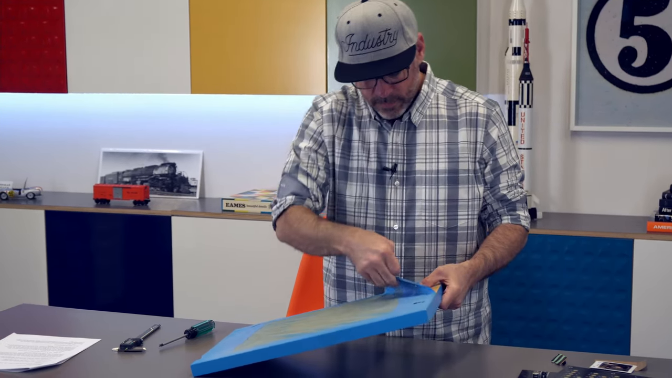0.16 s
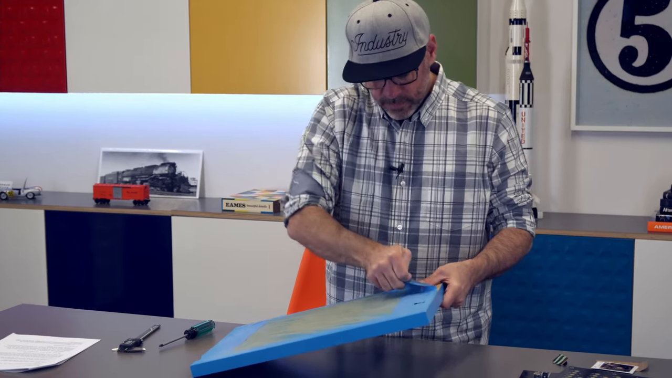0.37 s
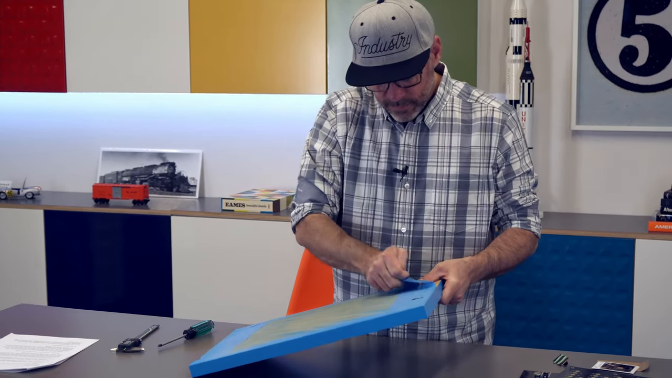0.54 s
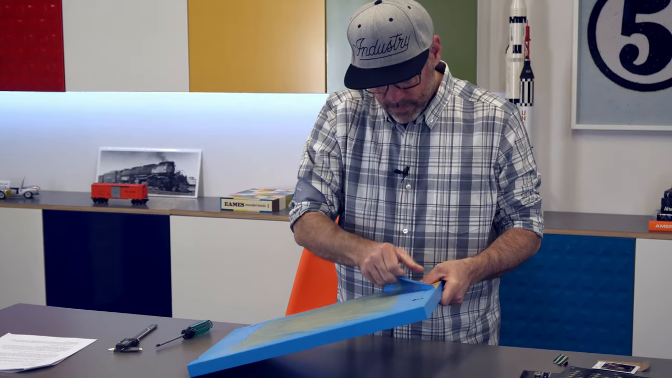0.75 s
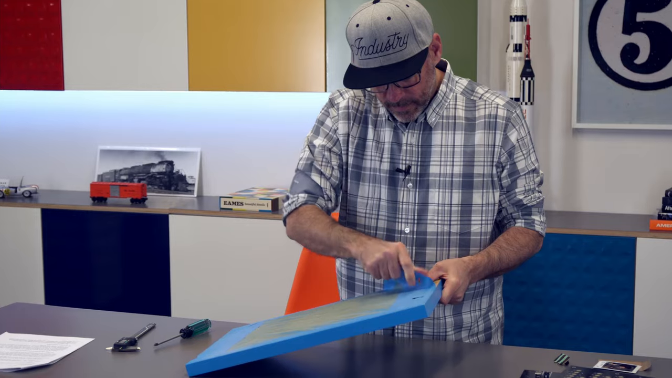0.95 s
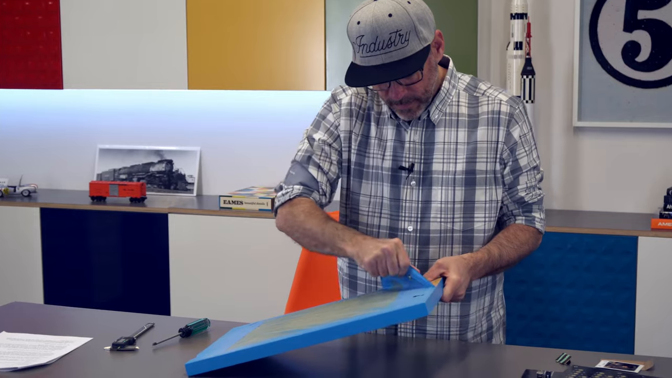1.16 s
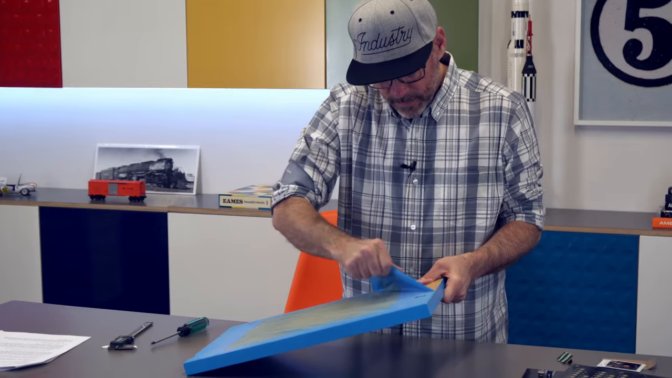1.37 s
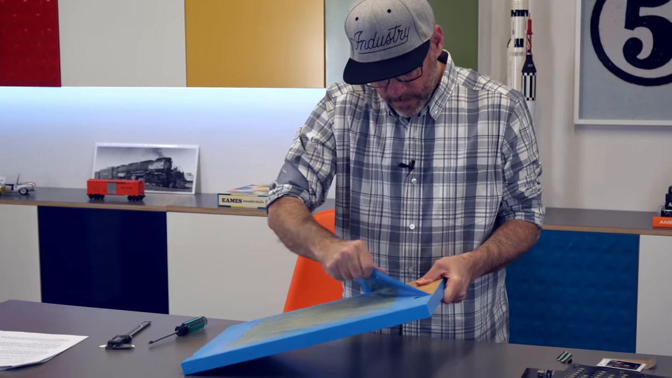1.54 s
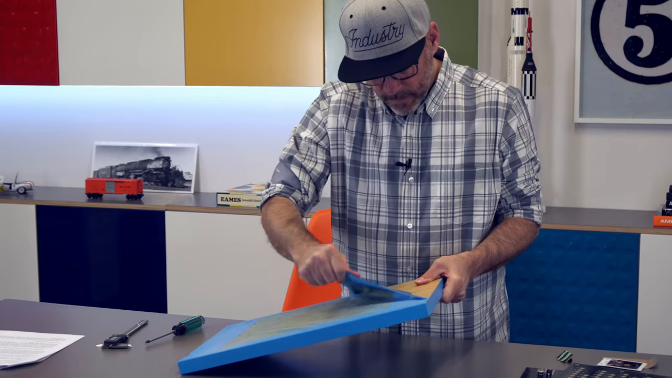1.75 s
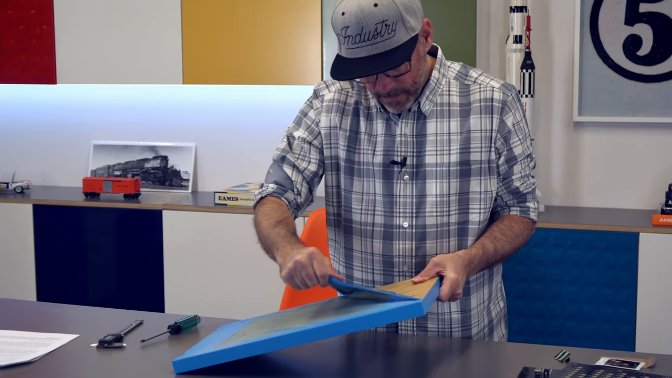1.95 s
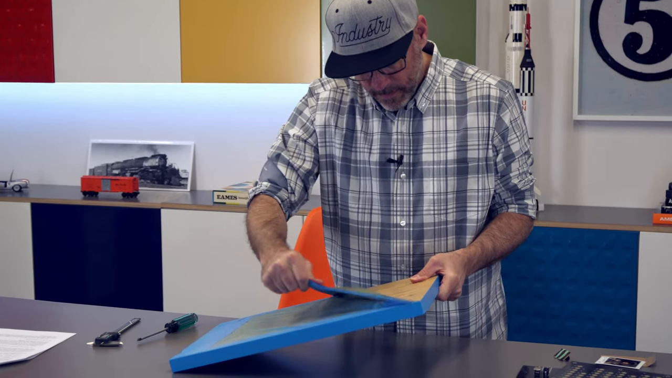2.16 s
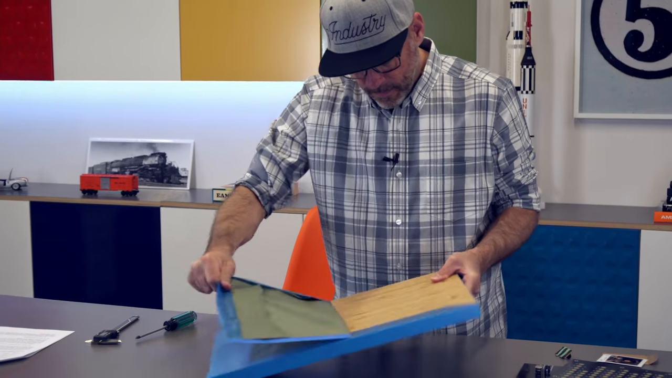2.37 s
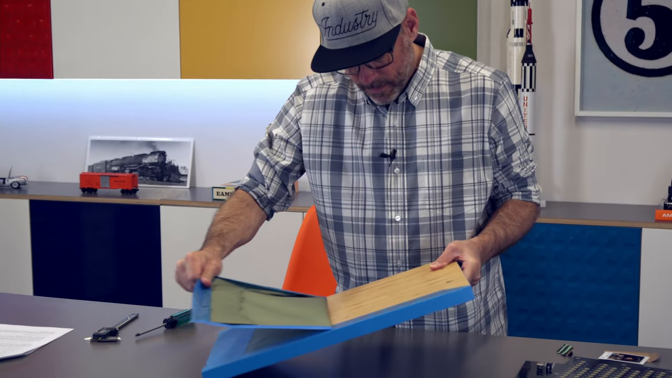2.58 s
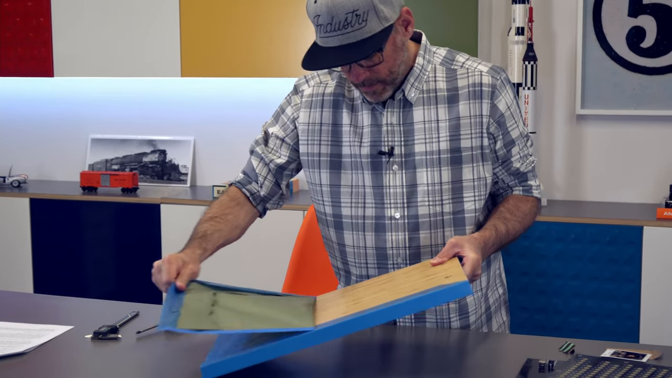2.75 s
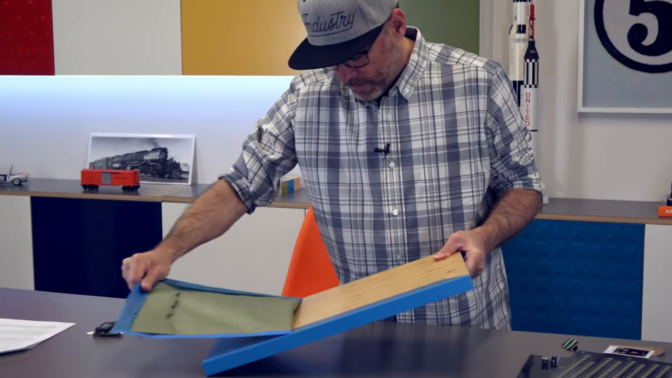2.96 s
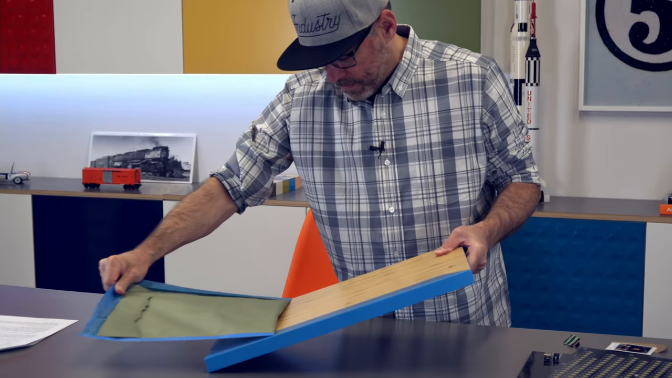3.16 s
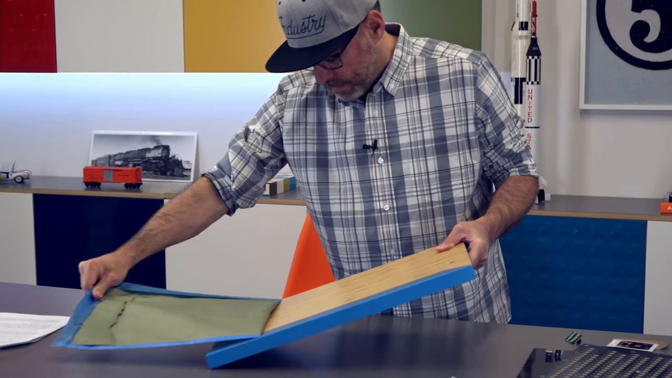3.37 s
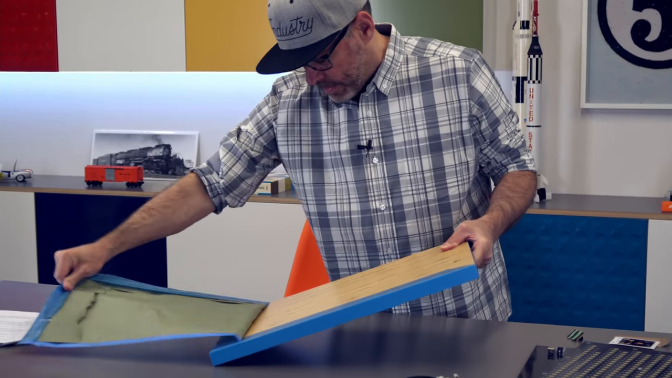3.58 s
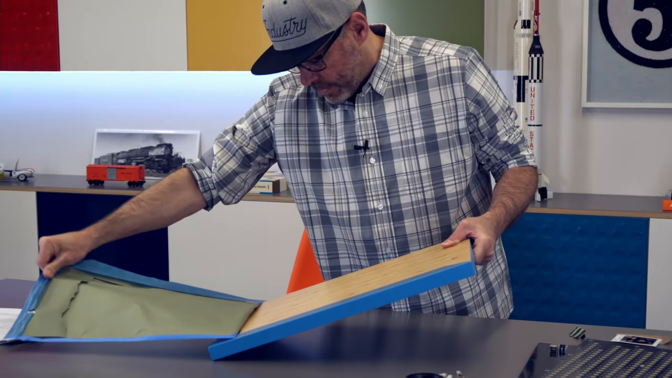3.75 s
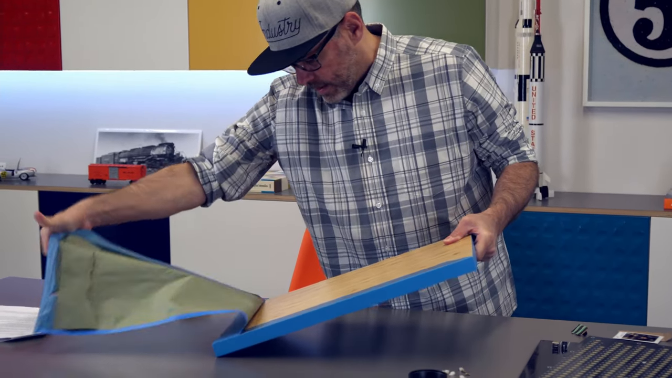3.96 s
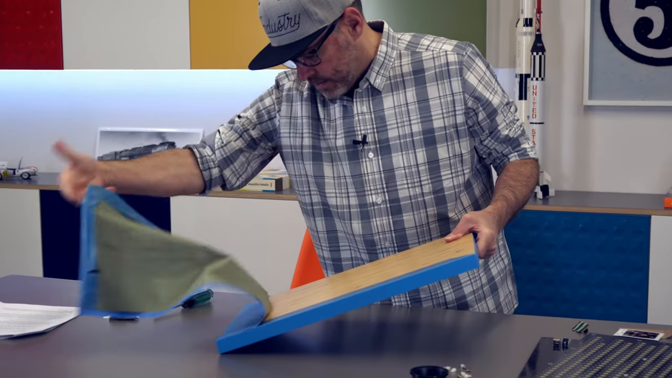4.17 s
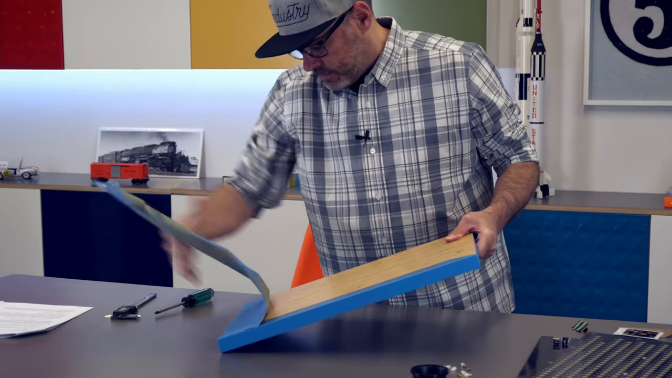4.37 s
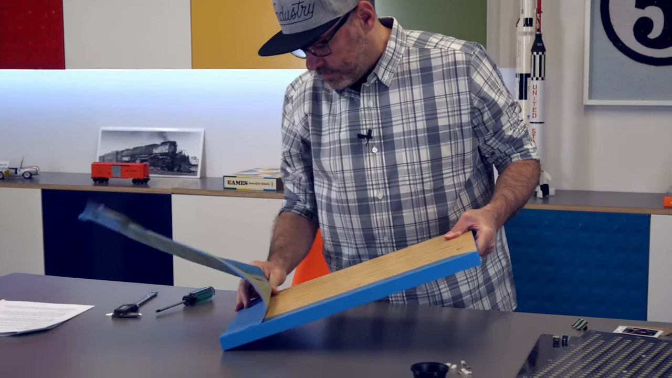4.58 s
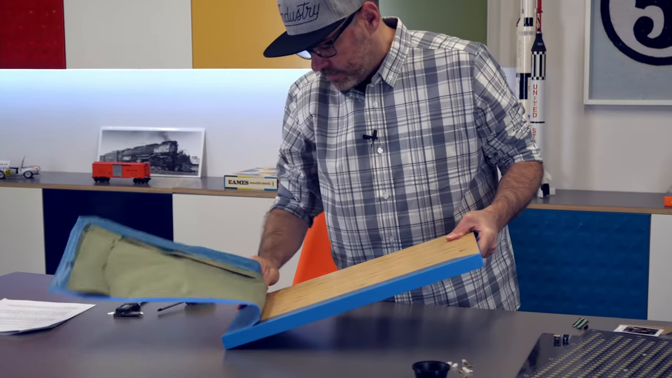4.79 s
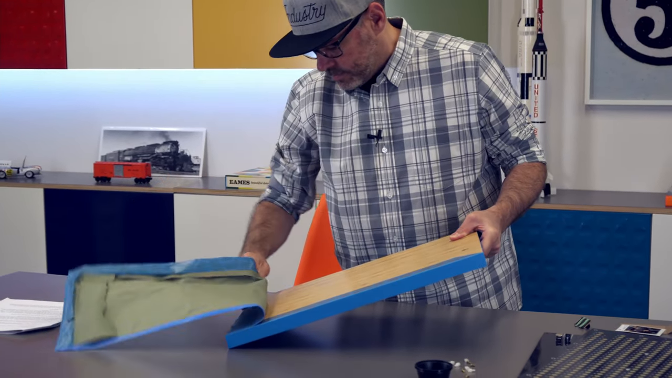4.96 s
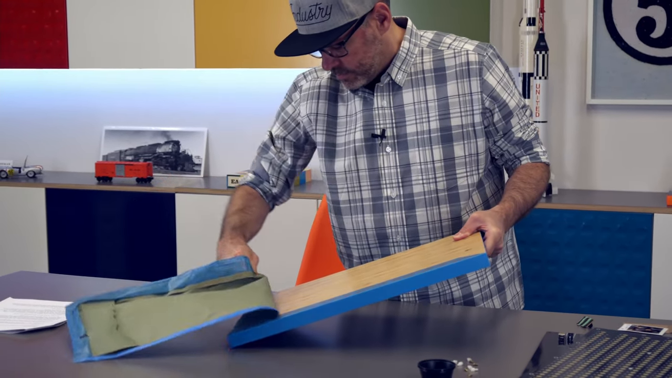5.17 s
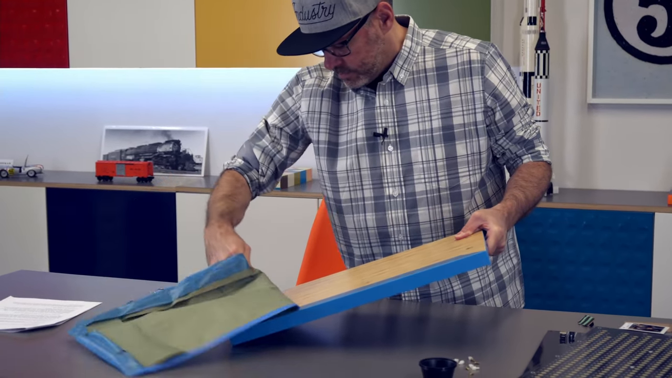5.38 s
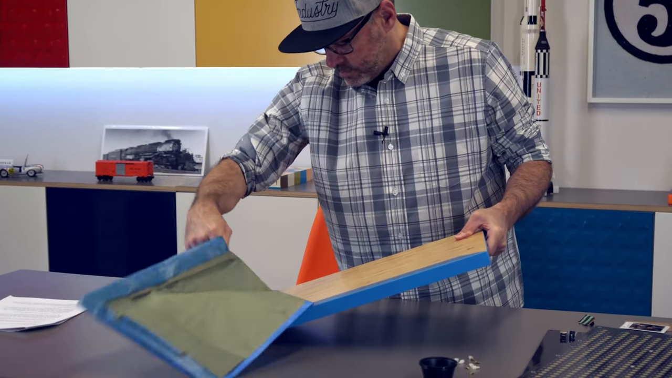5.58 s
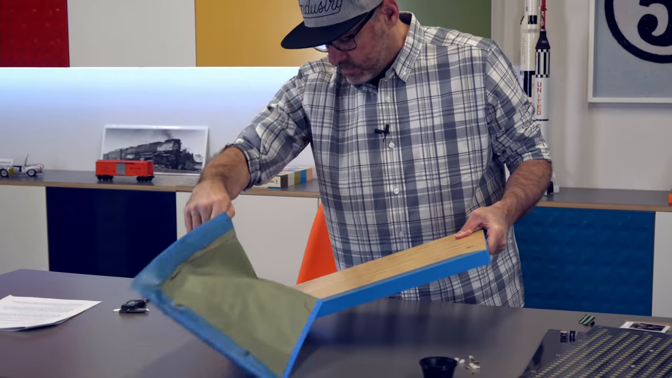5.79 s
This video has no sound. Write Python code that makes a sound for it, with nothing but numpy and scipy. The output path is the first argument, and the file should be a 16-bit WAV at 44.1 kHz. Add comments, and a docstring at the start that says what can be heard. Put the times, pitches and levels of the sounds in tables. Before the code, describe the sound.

In a quiet workshop, close to a clip-on microphone, tape and stiff paper come off a wooden frame. Faint glue crackles and isolated creasing snaps grow busier around 1.6 seconds; a loud rip with wooden knocks follows near 2.3, snapping densely until about 3.6. Then sparse rustles and pops, a few soft knocks, and a swelling crackle at the end.

```python
"""Masking tape and painted paper peel off a wooden frame, close to a clip-on microphone in a still workshop.
First the glue lets go in light crackles of tiny random pops, with a few snaps: creases buckling in short bursts.
From 1.2 s to 1.9 s a hand slides under the sheet, friction noise in a sinking resonance. Near 2.3 s the long rip
jerks the frame, whose modes ring as knocks; filtered-noise rustle and dense snaps follow until about 3.6 s.
The peel thins, a few knocks return after 5.2 s, and the pull strengthens to the end. The room answers faintly."""
import sys
import numpy as np
from scipy import signal
from scipy.fft import rfft, irfft, next_fast_len
from scipy.io import wavfile
from scipy.ndimage import uniform_filter1d

SR = 44100
rng = np.random.default_rng(int(sys.argv[2]) if len(sys.argv) > 2 else 0)


def store_wav(level_fs):
    """Save 16-bit WAV to argv[1]."""
    pcm = np.round(np.clip(np.atleast_2d(level_fs), -1, 1) * 32767)
    wavfile.write(sys.argv[1], SR, pcm.T.astype(np.int16))


N = 257103

# still room air, relative spectrum: (frequency [Hz], density [dB per Hz])
AIR_SPECTRUM = [(15, -50), (25, -17), (119, 14.5), (399, 2), (631, 2), (1660, -23), (2630, -18),
                (6380, -34), (7100, -14.5), (15500, -35)]
# decay of the room: (frequency [Hz], t60 [s])
ROOM_DECAY = [(200, 1), (2000, 0.3), (14000, 0.2)]
# modes of the wooden frame: (frequency [Hz], level [dB], t60 [s])
FRAME_MODES = [(120.4, -6, 0.11), (183.4, -9.5, 0.59), (357, 1, 0.13), (408.6, -1, 0.1), (541, -4, 0.086),
               (657, -8.5, 0.058), (875, -1, 0.042), (1034, -3.5, 0.1)]
# knocks on the frame: (time [s], peak [dB], centre of the blow [Hz])
FRAME_KNOCKS = [(0.566, -33.5, 387), (1.264, -40, 334), (2.271, -19, 370), (2.479, -13, 590),
                (2.495, -17, 810), (2.537, -15, 410), (2.597, -23, 390), (5.263, -30, 400),
                (5.285, -37, 150), (5.431, -23, 610)]
# hand under the lifting sheet, whose hollow deepens: (time [s], level [dB], resonance [Hz])
HAND_SLIDE = [(1.22, -77, 330), (1.39, -43.5, 305), (1.48, -59, 213.3), (1.57, -47.5, 164.2),
              (1.78, -52.5, 134), (1.9, -79, 122)]
# creases buckling: (time [s], crack [dB], hollow pop [dB re crack], fizz [dB re crack], length [ms])
CREASE_SNAPS = [(0.2455, -21.0, -8.5, -0.5, 0.27), (0.4197, -34, -2.5, 6.5, 0.4),
                (0.4452, -22.5, -7, -4, 2.1), (0.4854, -28.0, -7.5, -4.5, 0.61),
                (0.7959, -38.5, 6, -5.0, 1), (0.9506, -21, -3, -13, 0.19),
                (1.0409, -18.5, -2.5, -4.5, 0.36), (1.1997, -18.5, -3.5, -3.5, 0.18),
                (1.2787, -21, -14.0, 0, 0.3), (1.4255, -33, 7, -8.5, 0.54), (1.4371, -28.5, 2, 12, 0.31),
                (1.6231, -11.5, -1.0, -1, 0.96), (1.6452, -16.5, -7.5, -2, 0.5),
                (1.6611, -14, -10, -7, 0.39), (1.6786, -17.5, 3, 6.5, 1.4), (1.8324, -17.5, -4, -10, 1.24),
                (1.9635, -22.5, -2, -3.5, 2.1), (2.0012, -23.5, -6, -11, 0.17), (2.0501, -22, -10, -8, 1.2),
                (2.2404, -16.0, -4, 0.5, 0.7), (2.2538, -22, 1, 2, 1.8), (2.2879, -16.5, -11, 11, 1.12),
                (2.2973, -15, -25, -1, 7.8), (2.3129, -22, -2, 13, 0.93), (2.3377, -16.5, -2, 7.5, 1.5),
                (2.3548, -19, -8, 7, 1.0), (2.3627, -19, -4, 7, 0.51), (2.4114, -23, 6, 8, 1.6),
                (2.4643, -13.5, -7, -8, 0.38), (2.5407, -15.5, -3.5, 0, 1.2),
                (2.6342, -15.5, -0.5, -7, 1.8), (2.6514, -21, -1, -3.0, 0.54), (2.688, -18.5, -6, -5, 1.2),
                (2.729, -14.5, -3, -3, 0.49), (2.7545, -11.5, -8, -2.5, 0.3), (2.8013, -28, -12, 12, 0.2),
                (2.8433, -13, -1.5, -0.5, 2.9), (2.8896, -17.5, 3, 1.5, 1), (2.896, -23, 7, 3, 2.1),
                (3.0246, -19.0, -0.5, -2, 1.8), (3.0354, -12, -10, -5, 0.29), (3.042, -17, -5, 2, 1.6),
                (3.0556, -16.5, -2, -0.5, 5.4), (3.1155, -11.5, -15, 0, 0.39), (3.163, -9, -18, -13, 0.18),
                (3.1913, -15.5, -12, -4, 0.3), (3.2006, -15, -4.5, -1, 1.2), (3.2433, -23, 4, -5, 1.8),
                (3.311, -12.0, -6.5, -3, 0.098), (3.3192, -18, -7.5, -15, 0.42),
                (3.3973, -18, -6, -13, 1.4), (3.4419, -12.5, -14.5, -1.5, 0.17),
                (3.4636, -21, -1, 0.5, 2.8), (3.475, -24.0, -7, 6, 0.54), (3.4894, -14, -9.5, -12, 0.49),
                (3.509, -20.0, -16, -1, 0.66), (3.5224, -19, -14, 2, 0.25), (3.532, -21.5, -25, 0, 0.15),
                (3.5796, -15, -18, -6.5, 0.56), (3.7834, -19.5, -21, 1, 0.55),
                (3.9775, -23.5, -0.5, 2.5, 0.5), (4.08, -22.5, -4.5, -2.5, 1.9),
                (4.2156, -37, -12, -21, 1.4), (4.2601, -27, -2, -5, 3.1), (4.306, -22.5, -6, -16, 2.2),
                (4.374, -26.5, -3, -11, 1.3), (4.4058, -21, -4, -9.5, 2.7), (4.4165, -24, -4, -4, 4.2),
                (4.81, -19.5, -0.5, -4, 0.4), (4.8525, -35, -9, 10, 0.2), (4.9297, -29, -0.5, 0, 0.52),
                (5.0372, -28.5, 1.5, 1, 3), (5.4752, -16.5, -1, -2.5, 0.9), (5.4827, -21.5, 3.5, -3, 2.5),
                (5.6593, -20.5, -2, -2.5, 0.3), (5.7431, -12, -7, -11, 2.7),
                (5.7687, -12.5, -15, -5.5, 4.3)]
# steady pull on the tape: (time [s], glue crackle [dB])
STEADY_PULL = [(0.06, -71.5), (0.22, -62), (0.26, -56.5), (0.78, -62), (1.24, -55), (1.38, -47.5),
               (1.76, -43), (1.92, -49), (2.2, -40.5), (2.58, -39.5), (3.05, -39), (3.35, -43),
               (3.62, -39.5), (4.19, -50.5), (4.44, -43.5), (4.75, -54.5), (4.9, -49), (5.15, -50),
               (5.83, -37)]
# tugs, a stretch of tape letting go at once; those near 2.3 s are the main rip:
# (start [s], length [s], crackle [dB], rustle [dB re crackle])
TAPE_TUGS = [(-0.014, 0.046, -57, -1.5), (0.437, 0.044, -51, -16), (0.59, 0.077, -60, 3.5),
             (0.688, 0.013, -52, 7.5), (0.845, 0.02, -48, 9), (1.622, 0.14, -44.5, -2.5),
             (1.762, 0.023, -41, 4.5), (1.953, 0.013, -37, -3), (2.12, 0.012, -34, -3),
             (2.262, 0.026, -35.5, 0), (2.294, 0.084, -26.5, -2.5), (2.331, 0.11, -27, -2),
             (2.494, 0.0084, -29.5, -4), (2.578, 0.0052, -26, -4), (2.943, 0.014, -32.5, -2.5),
             (3.167, 0.076, -36.5, -2), (3.787, 0.0067, -30.5, -12.5), (3.88, 0.053, -31.5, -6),
             (3.986, 0.024, -34.5, -6), (4.302, 0.013, -36, -2.5), (4.355, 0.0069, -29, -5.5),
             (4.496, 0.013, -27, -3), (4.592, 0.028, -56, 8.5), (4.678, 0.011, -43.5, -2),
             (4.801, 0.065, -40, 0), (5.24, 0.047, -45.5, 3), (5.313, 0.0059, -44, 9),
             (5.35, 0.0037, -39, 6.5), (5.422, 0.073, -43, 2), (5.626, 0.023, -36, -1.5),
             (5.721, 0.025, -28.5, -17)]
# how the sheet is held: (time [s], fizz [dB re crackle], flexing [dB re rustle])
SHEET_HOLD = [(0.0, 2, -61), (0.55, -4, -2.5), (0.85, -4, -9.5), (1.4, 2, -2.5), (2.0, -3.5, -9),
              (2.42, 1.8, -13), (2.6, -3.5, -1.5), (2.95, 0, -6), (3.55, -2, -4.5), (3.72, -1.5, -2.5),
              (3.92, -7, -4), (4.25, -4, -1), (4.82, -6.5, -3), (5.13, 3.5, 1.5), (5.35, 0, -3.5),
              (5.7, -7, -1), (5.83, -1, 2)]
# smooth sliding as opposed to rupture: (time [s], share [0-1])
SLIP_SHARE = [(0.2, 0.1), (0.9, 0.15), (1.45, 0.3), (2.3, 0.1), (3.0, 0.57), (4.4, 0.13), (4.65, 0.3),
              (5.5, 0.42)]
# radiation of the sheet, relative spectrum: (frequency [Hz], density [dB per Hz])
PAPER_SPECTRUM = [(60, -39), (156, -7.5), (220, -8), (359, -4.5), (533, 0), (1050, 1.5), (1650, 5),
                  (3200, -1.5), (4420, 0), (6560, -1.5), (7720, -5.5), (15500, -12.5)]

# registers of the sheet
FLEX_BAND_HZ, RUSTLE_BAND_HZ = (100, 600), (600, 2450)
CRACKLE_BAND_HZ, FIZZ_BAND_HZ = (2800, 8000), (8000, 16000)
# centres of a snap's registers; spread of the crack's pitch from crease to crease, in log frequency
SNAP_POP_HZ, SNAP_CRACK_HZ, SNAP_FIZZ_HZ, PITCH_SPREAD = 1634, 5630, 11520, 0.21
# a tug's rise time and its dying time constant: seconds plus a share of its length
ATTACK_S, ATTACK_SHARE = 0.00098, 0.058
RELEASE_S, RELEASE_SHARE = 0.0056, 0.46
EVENNESS = 0.25  # how far the random pops are evened out over 50 ms [0-1]
AIR_DB, PEEL_TO_ROOM_DB, HITS_TO_ROOM_DB = -64.5, -25.0, -23.5
TOP_HZ = 16050  # band limit of the recorder


def amp(db):
    """Decibels to gain."""
    return 10 ** (np.asarray(db) / 20)


def unit(x):
    """Scale to rms 1."""
    return x / np.sqrt(np.mean(x ** 2) + 1e-20)


def along(points, hz):
    """(frequency [Hz], value) points read on a log-frequency axis."""
    f, v = np.transpose(points)
    return np.interp(np.log(hz + 1), np.log(f + 1), v)


def curves(rows):
    """One value per sample for each column after the time."""
    s, *cols = np.transpose(rows)
    return [np.interp(np.arange(N) / SR, s, c) for c in cols]


def filtered(x, response):
    """x times a response of frequency."""
    m = next_fast_len(N + SR // 2)
    hz = np.fft.rfftfreq(m, 1 / SR)
    return irfft(rfft(x, m) * response(hz), m)[:N]


def band(x, edges_hz, order):
    """Causal band-pass."""
    edges_hz = np.minimum(edges_hz, SR / 2 - 100)
    sos = signal.butter(order, edges_hz, "band", fs=SR, output="sos")
    return signal.sosfilt(sos, x)


def add(track, s, sound):
    """Mix a sound into the track at time s."""
    part = track[round(s * SR):][:len(sound)]
    part += sound[:len(part)]


def still_air():
    """Steady noise shaped to the spectrum of the quiet room."""
    noise = rng.standard_normal(N)
    return amp(AIR_DB) * unit(filtered(noise, lambda hz: amp(along(AIR_SPECTRUM, hz))))


def workshop(x):
    """The room's diffuse answer: a noise tail of unit energy, shorter in the treble."""
    hz, t, z = signal.stft(rng.standard_normal(SR // 2), SR, nperseg=256)
    decay = amp(-60 * t / along(ROOM_DECAY, hz)[:, None])
    tail = signal.istft(z * decay, SR, nperseg=256)[1]
    tail = np.pad(tail, (SR // 200, 0))  # 5 ms later than the direct sound
    return signal.fftconvolve(x, tail / np.linalg.norm(tail))[:N]


def knocks():
    """Soft blows ring the frame's modes near their own pitch; the harder the tug, the more the grip damps them."""
    out, t = np.zeros(N), np.arange(SR // 2) / SR
    hz, level_db, t60_s = np.transpose(FRAME_MODES)[:, :, None]
    for s, db, centre_hz in FRAME_KNOCKS:
        off_pitch_db = 6 * np.abs(np.log2(hz / centre_hz))
        strength_db = level_db + rng.standard_normal(hz.shape) - off_pitch_db
        tones = np.sin(2 * np.pi * (hz * t + rng.random(hz.shape)))
        ringing = (amp(strength_db - 60 * t / t60_s) * tones).sum(axis=0)
        grip = amp(-.8 * (db + 36.5)) + amp(-60 * t / 0.047)
        scuff = unit(band(rng.standard_normal(len(t)), centre_hz * np.array([.4, 2.4]), order=2))
        scuff = 0.97 * scuff * amp(-60 * t / 0.022)
        soft_onset = 1 - np.exp(-t / 0.0075)
        blow = (grip * ringing + scuff) * soft_onset
        add(out, s, amp(db) * blow / np.abs(blow).max())
    return out


def sliding():
    """Friction noise in one broad resonance that sinks as the hollow grows."""
    db, hz = curves(HAND_SLIDE)
    width_hz = 42
    # two slow noises on a carrier in quadrature make a band of noise around it
    sway = [filtered(rng.standard_normal(N), lambda f: 1 / (1 + (f / width_hz) ** 4)) for _ in range(2)]
    phase = 2 * np.pi * np.cumsum(hz) / SR
    return amp(db) * unit(sway[0] * np.cos(phase) + sway[1] * np.sin(phase))


def burst(edges_hz, life_ms, ring_db, ring_ms):
    """A sudden kick and a dying flutter in one band, with the energy of one millisecond at rms 1."""
    ms = np.arange(SR // 50) * 1000 / SR
    rise_ms = 0.29
    decay = np.exp(-ms / life_ms) + amp(ring_db) * np.exp(-ms / ring_ms)
    shape = (1 - np.exp(-ms / rise_ms)) * decay
    flutter = unit(band(rng.standard_normal(len(ms)) * shape, edges_hz, order=2))
    click = signal.unit_impulse(len(ms), rng.integers(6, 16))
    kick = unit(band(click, edges_hz, order=4))
    sound = np.sign(rng.standard_normal()) * kick + (.5 + life_ms) * flutter
    return sound / np.linalg.norm(sound) * np.sqrt(SR / 1000)


def snap(db, pop_db, fizz_db, ms):
    """A crease flips with a crack; a patch of sheet pops along with it and thuds faintly."""
    octave = np.array([1 / np.sqrt(2), np.sqrt(2)])
    # the pop varies less in pitch than the crack
    pop_pitch, crack_pitch = np.exp(PITCH_SPREAD * rng.standard_normal(2) * [.5, 1])
    pop = burst(SNAP_POP_HZ * pop_pitch * octave, ms, ring_db=-26, ring_ms=2.5)
    thud = amp(-11.5) * burst(np.array([280, 760]), ms, ring_db=-15, ring_ms=5.7)
    crack = burst(SNAP_CRACK_HZ * crack_pitch * octave, ms, ring_db=-14, ring_ms=2.3)
    fizz = burst(SNAP_FIZZ_HZ * octave, .8 * ms, ring_db=-8, ring_ms=1.2)
    return amp(db) * (crack + amp(pop_db) * (pop + thud) + amp(fizz_db) * fizz)


def snaps():
    """The big creases buckle one by one."""
    out = np.zeros(N)
    for s, db, pop_db, fizz_db, ms in CREASE_SNAPS:
        add(out, s, snap(db, pop_db, fizz_db, ms))
    return out


def effort():
    """Crackle and rustle levels [dB]: the steady pull plus each tug with its attack, hold and release."""
    t = np.arange(N) / SR
    pull_db, = curves(STEADY_PULL)
    crackle_power, rustle_power = amp(pull_db) ** 2, amp(pull_db - 1.5) ** 2
    for s, length_s, db, rustle_db in TAPE_TUGS:
        attack_s = ATTACK_S + ATTACK_SHARE * length_s
        release_s = RELEASE_S + RELEASE_SHARE * length_s
        rise = np.clip((t - s) / attack_s + .5, 0, 1)  # half risen at the start time
        fall = np.exp(-np.clip((t - s - length_s) / release_s, 0, 20))
        power = (amp(db) * rise * fall) ** 2
        crackle_power = crackle_power + power
        rustle_power = rustle_power + power * amp(rustle_db) ** 2
    return 10 * np.log10(crackle_power), 10 * np.log10(rustle_power)


def pops(rate_hz, spread_db, life_ms):
    """Power, of mean 1, of a stream of tiny ruptures, partly evened out over 50 ms so no random pop sticks out."""
    sizes = amp(spread_db * np.minimum(rng.standard_normal(N), 2)) ** 2
    starts = sizes * (rng.random(N) < rate_hz / SR)
    ms = np.arange(SR // 100) * 1000 / SR
    pulse = ms * np.exp(-2 * ms / life_ms)
    power = np.abs(signal.fftconvolve(starts, pulse)[:N])
    local_mean = uniform_filter1d(power, size=SR // 20)
    power = power / (local_mean + power.mean() / 10) ** np.clip(EVENNESS, 0, 1)
    return power / power.mean()


def paper(power, edges_hz, smooth):
    """One register of the sheet, shaken by ruptures and by a smooth share of sliding."""
    smooth = np.clip(smooth, 0, 1)
    drive = rng.standard_normal(N) * np.sqrt(smooth + (1 - smooth) * power)
    radiated = filtered(drive, lambda hz: amp(along(PAPER_SPECTRUM, hz)))
    return unit(band(radiated, edges_hz, order=3))


def frame_tone(power):
    """The tugs of the tape keep the resonant modes of the frame ringing."""
    def response(f):
        total = 0
        for hz, db, t60_s in FRAME_MODES:
            width_hz = np.log(1000) / (np.pi * t60_s)  # bandwidth of a mode that dies in t60
            total = total + amp(db) * 1j * f * width_hz / (hz * hz - f * f + 1j * f * width_hz)
        return total

    tugs = rng.standard_normal(N) * np.sqrt(power)
    return unit(filtered(tugs, response))


def peeling():
    """Glue strands break along the peel line; the sheet radiates them and adds its own crinkles."""
    crackle_db, rustle_db = effort()
    fizz_db, flex_db = curves(SHEET_HOLD)
    slip, = curves(SLIP_SHARE)
    glue = pops(rate_hz=520, spread_db=9, life_ms=1.0)
    fibres = pops(rate_hz=950, spread_db=14.5, life_ms=0.68)
    crinkle = pops(rate_hz=300, spread_db=8.5, life_ms=1.77)
    crackle = amp(crackle_db) * paper(glue, CRACKLE_BAND_HZ, slip)
    fizz = amp(crackle_db + fizz_db) * paper((glue + fibres) / 2, FIZZ_BAND_HZ, slip)
    rustle = amp(rustle_db) * paper((glue + crinkle) / 2, RUSTLE_BAND_HZ, slip)
    # the whole sheet bends more slowly than it rustles, and strains the frame as it does
    bend = amp(uniform_filter1d(rustle_db, size=SR // 25) + flex_db)
    bend_power = (1 + crinkle) / 2
    sheet = amp(1.0) * paper(bend_power, FLEX_BAND_HZ, slip)
    frame = amp(-2.5) * frame_tone(bend_power)
    return crackle + fizz + rustle + bend * (sheet + frame)


def scene():
    """Tape, sheet and frame over the still air of the room."""
    air = still_air()
    hits = knocks() + snaps()
    peel = sliding() + peeling()
    answer = workshop(amp(PEEL_TO_ROOM_DB) * peel + amp(HITS_TO_ROOM_DB) * hits)
    return (peel + hits + answer + air)[None]


def record(dry):
    """The recorder rounds off the tallest peaks and keeps nothing above its band limit."""
    held = dry[0] / (1 + np.abs(dry[0] / .92) ** 6) ** (1 / 6)
    return filtered(held, lambda hz: hz < TOP_HZ)[None]


dry = scene()
out = record(dry)
store_wav(out)
```